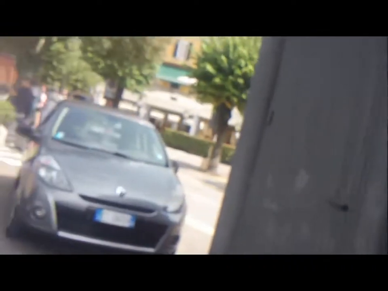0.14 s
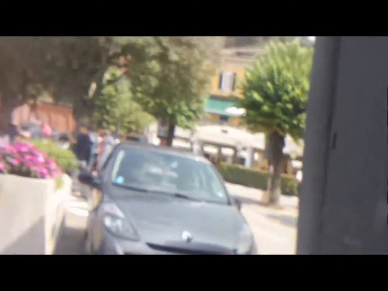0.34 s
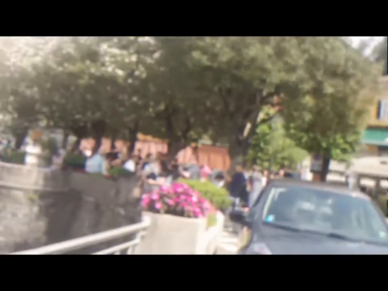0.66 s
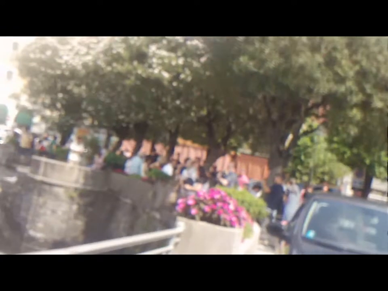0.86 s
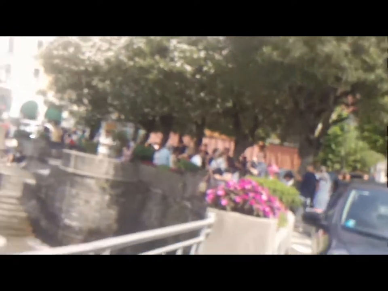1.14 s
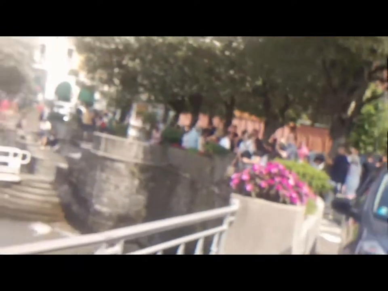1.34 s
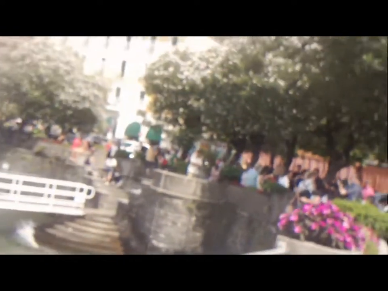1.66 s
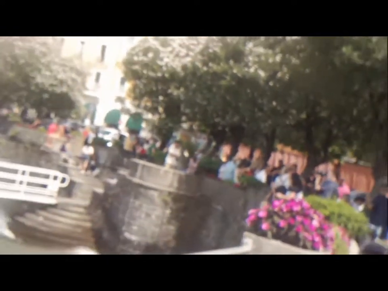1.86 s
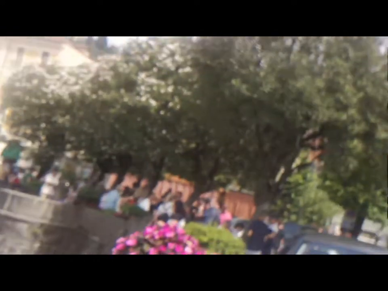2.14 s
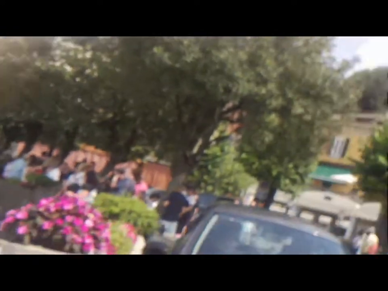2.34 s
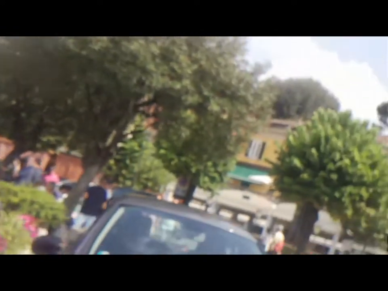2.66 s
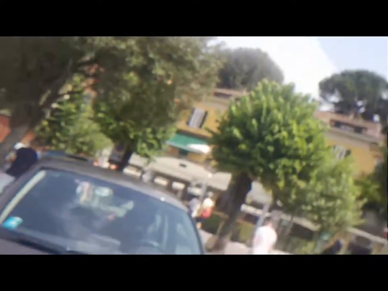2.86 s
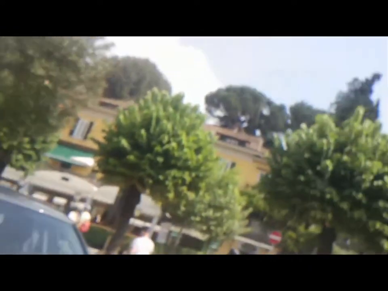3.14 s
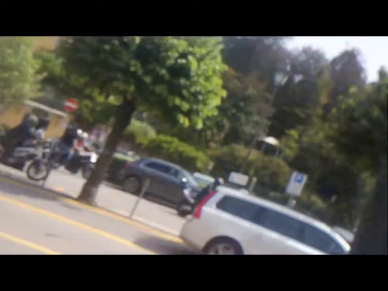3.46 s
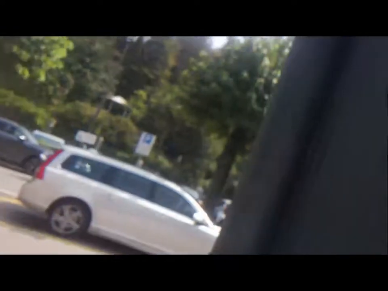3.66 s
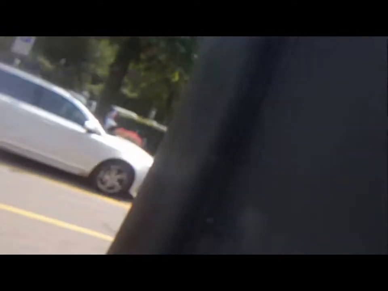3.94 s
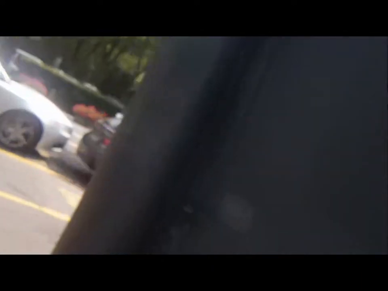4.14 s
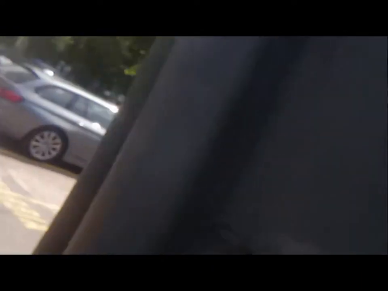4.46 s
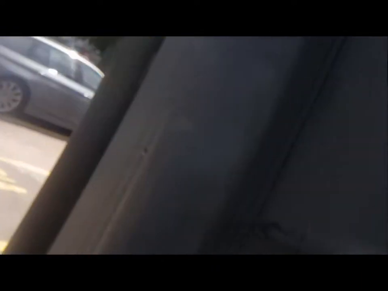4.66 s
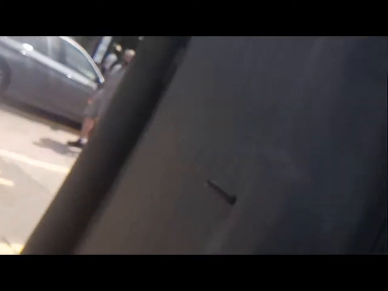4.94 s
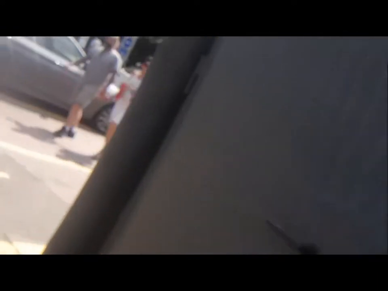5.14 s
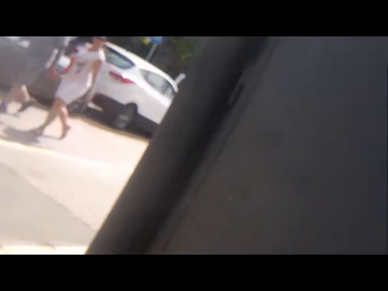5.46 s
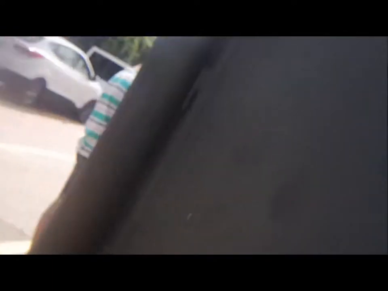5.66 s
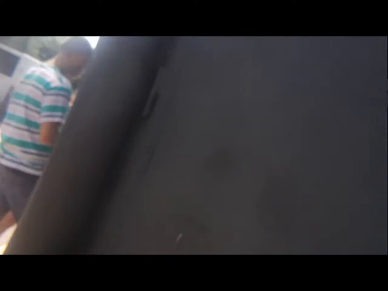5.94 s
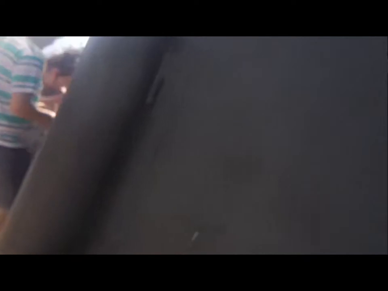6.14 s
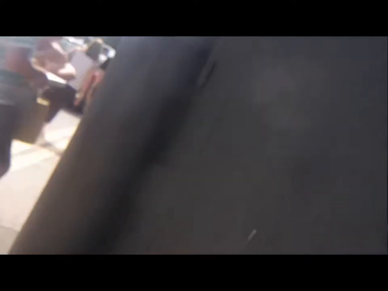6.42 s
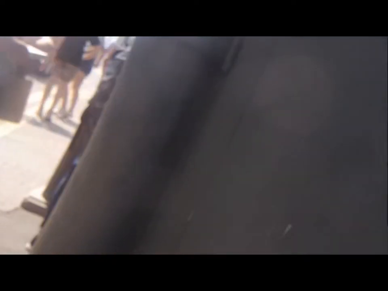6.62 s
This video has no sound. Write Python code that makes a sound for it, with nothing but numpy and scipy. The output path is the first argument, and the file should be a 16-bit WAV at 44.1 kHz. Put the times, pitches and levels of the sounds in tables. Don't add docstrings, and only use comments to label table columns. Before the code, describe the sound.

Close stereo microphone inside an open vehicle beside a busy street. A low drone idles under a steady high pump whine and traffic roar. The engine revs and pulls away, a slower chugging engine joining below. A fluttering squeal swells, then the whine drops and stops. Spitting air and knocks follow as both engines pick up speed, ending in a heavy low thump with rattling.

```python
import sys
import numpy as np
from scipy import signal
from scipy.fft import rfft, irfft, next_fast_len
from scipy.io import wavfile
from scipy.ndimage import uniform_filter1d, map_coordinates

SR = 44100
rng = np.random.default_rng(int(sys.argv[2]) if len(sys.argv) > 2 else 0)


def wav_record(signal):
    frames = np.transpose(np.atleast_2d(signal))
    bounded = np.clip(frames, -1, 1)
    quanta = np.round(bounded * 32767).astype(np.int16)
    wavfile.write(sys.argv[1], SR, quanta)


def gain_from_db(level_db):
    decades = np.asarray(level_db, float) / 20
    return 10 ** decades


N = 299439
STEP = 8

# (time [s], firing rate [Hz], load [dB], throttle swelling the strong orders [dB])
NEAR_ENGINE = [(2.4, 47.9, -44, -5), (2.61, 47.9, -30, -1), (2.749, 44.96, -25, 3.5), (2.86, 54.7, -24, -2),
               (3.06, 63.2, -25.5, 4), (3.28, 60.3, -26, 2.5), (3.57, 57.6, -24.5, -0.3),
               (4.001, 60.3, -20, -2), (4.199, 60.8, -24.5, -2.5), (4.36, 55.6, -22.5, -0.5),
               (4.62, 67.82, -24.5, -0.5), (5.0, 49.74, -22, -1.5), (5.31, 45.73, -21, -8),
               (5.52, 47.49, -21, -2.5), (5.87, 50.97, -22, 3.5), (6.25, 57.02, -26.5, 9.5),
               (6.69, 65.5, -26.5, 6), (6.79, 63.96, -28.5, 0.5)]
# (time [s], nearness [dB], brightness [dB])
TRAFFIC_PASSING = [(0.0, -0.5, 0.1), (0.48, 1, 1.3), (0.56, -2.5, 1), (1.2, 2.5, -2.1), (1.5, -1.3, 1),
                   (1.7, 3, -0.9), (1.95, -0.5, 1.3), (2.04, 3.5, 1), (2.5, 3, -1.1), (3.0, 2, 2.5),
                   (3.95, 3, 3), (4.06, 0, 2.2), (4.25, -0.5, -1.6), (4.9, -1.7, 0.7), (5.5, -2, -2.5),
                   (5.9, -0.7, -0.6), (6.5, -1.5, 0.3), (6.79, -4, 0.3)]
# (frequency [Hz], difference over sum [dB], likeness [0-1], lead of difference [rad])
MIC_PORTS = [(45, 1.4, .97, -2.55), (100, .4, 1, -2.34), (200, -2.1, .99, -1.98), (350, -6.3, .95, -1.72),
             (600, -8.5, .59, -1.56), (1000, -10.8, .75, -1), (1600, -7.8, .5, -.8), (2400, -4.7, .13, -1),
             (3400, -3.9, .36, .2), (4600, 1.1, .34, 0), (6200, 4.4, .39, -.2), (7400, 8, .35, 0),
             (8600, 12, .3, 0), (12000, 17.5, .3, 0), (15000, 18, .3, 0)]


def evened(x):
    return x / np.sqrt(np.mean(x ** 2) + 1e-20)


def read(points, hz, axis=1):
    table = np.transpose(points)
    return np.interp(np.log(hz + 1), np.log(table[0] + 1), table[axis])


def curves(rows, fade=0.01):
    s, *columns = np.transpose(rows)
    t = np.arange(N) / SR
    gate = np.clip(np.minimum(t - s[0], s[-1] - t) / fade + 1, 0, 1)
    return [np.interp(t, s, c) for c in columns] + [gate]


def wander(per_s, size=1):
    steps = rng.standard_normal(int(N / SR * per_s) + 3)
    coarse = np.arange(0, N + 64, 64)
    drift = map_coordinates(steps, [coarse / SR * per_s], order=3, mode="nearest")
    return np.interp(np.arange(0, N, size), coarse, drift)


def tone(hz):
    return np.cos(2 * np.pi * np.cumsum(hz) / SR)


def ports(x, other=None):
    size = next_fast_len(N + 4096)
    hz = np.fft.rfftfreq(size, 1 / SR)
    z = rfft(x, size) * np.exp(1j * read(MIC_PORTS, hz, axis=3))
    if other is not None:
        same = np.clip(read(MIC_PORTS, hz, axis=2), 0, 1)
        z = same * z + np.sqrt(1 - same ** 2) * rfft(other, size)
    return np.array([x, irfft(z * gain_from_db(read(MIC_PORTS, hz)), size)[:N]])


def resonate(x, hz, width):
    turn = np.exp(2j * np.pi * np.cumsum(hz) / SR)
    r = np.exp(-np.pi * width / SR)
    return 2 * (turn * signal.lfilter([1 - r], [1, -r], x / turn)).real


def surroundings(turns):
    centres = [330, 650, 3300, 9000]
    # (resting level [dB], share of nearness, share of brightness, rise with rolling [dB per m/s])
    layers = [
        (5.5, 0.082, 0.2, 3),
        (4.5, 0.97, 0, 0),
        (4, 1.08, 0.96, 0.5),
        (5, 0.27, 1.32, 0),
    ]
    # (time [s], speed [m/s])
    rolling = [
        (0, 0.5),
        (1.9, 0),
        (2.1, 1.6),
        (2.5, 1.5),
        (3, 2.5),
        (6.1, 4),
        (6.4, 4),
        (6.62, 6),
        (6.79, 3),
    ]
    # (frequency [Hz], density [dB per Hz])
    colour = [(40, -56), (90, -45), (250, -50), (450, -56), (620, -60), (800, -55), (1100, -57),
              (1400, -60), (1800, -57), (2300, -62), (7000, -61), (9000, -62), (12200, -64), (15400, -73)]
    frames, hz = N // 256 + 5, np.fft.rfftfreq(1024, 1 / SR)
    at = np.clip(np.arange(frames) * 256, 0, N - 1)
    near_db, bright_db, _ = curves(TRAFFIC_PASSING)
    speed = curves(rolling)[0]
    near_db = near_db + 0.29 * wander(14)
    swell_db = 0
    for row, (db, near_share, bright_share, per_speed) in zip(np.eye(len(centres)), layers):
        region = np.interp(np.log(hz + 1), np.log(centres), row)
        level_db = db + near_share * near_db + bright_share * bright_db + per_speed * speed
        gusts_db = 0.61 * wander(9)
        swell_db = swell_db + np.outer(region, (level_db + gusts_db)[at])
    a, b, c, d, patches = rng.standard_normal((frames, 513, 5)).T
    patches = uniform_filter1d(uniform_filter1d(patches, 8, 0), 10, 1)
    patches = .7 * evened(patches)
    colour_db = read(colour, hz) - read(MIC_PORTS, hz)
    z = np.array([a + 1j * b, c + 1j * d])
    z = z * gain_from_db(colour_db[:, None] + swell_db + 1.6 * patches + 32.0)
    noise = signal.istft(z, nperseg=1024, noverlap=768)[1][:, :N] / np.sqrt(1024)
    return ports(*(noise * (1 + 0.1 * np.cos(turns))))


def bursts():
    # (time [s], level [dB], low edge [Hz], high edge [Hz], decay time t60 [s])
    knocks = [(2.015, -42, 150, 4000, .5), (2.04, -30, 150, 450, .08), (3.835, -27, 1500, 9000, 0.18),
              (3.935, -28, 1500, 7000, 0.14), (4.434, -26.5, 1300, 14700, 0.17),
              (4.44, -27.5, 899, 2760, 0.51), (4.93, -23.5, 399.2, 1485, 0.11),
              (5.068, -21, 300.2, 1500, 0.048), (5.16, -23, 400, 1500, 0.078),
              (5.948, -32, 4996, 7010, 0.23), (6.546, -13.5, 300, 1902, 0.046),
              (6.553, -26.5, 1500, 5001, 0.29), (6.57, -9.5, 81, 150.9, 0.22),
              (6.578, -12, 301, 790, 0.091), (6.593, -17, 350, 1357, .07)]
    out, t = np.zeros((2, N)), np.arange(SR // 2) / SR
    for s, db, low_hz, high_hz, t60 in knocks:
        band = signal.butter(3, [low_hz, min(high_hz, 16000)], "bandpass", fs=SR, output="sos")
        noise = evened(signal.sosfilt(band, rng.standard_normal((2, len(t)))))
        rise = .03 * t60
        envelope = np.minimum(t / rise, 1) * gain_from_db(db - 60 * np.maximum(t - rise, 0) / t60)
        part = out[:, round(s * SR):][:, :len(t)]
        part += (noise * envelope)[:, :part.shape[1]]
    return ports(*out)


def leak():
    # (time [s], level [dB])
    let_off = [
        (4.432, -46),
        (4.445, -50),
        (4.465, -50),
        (4.49, -46),
        (4.9, -49),
        (5.12, -41),
        (5.26, -47),
        (5.3, -58),
    ]
    level_db, gate = curves(let_off, fade=.003)
    band = signal.butter(3, [7000, 12400], "bandpass", fs=SR, output="sos")
    air = evened(signal.sosfilt(band, rng.standard_normal(N)))
    hiss = gate * gain_from_db(level_db + 2.5 * wander(25)) * air
    return np.array([hiss, 1.2 * hiss])


def intake():
    lead_s = .07
    rate, *_, gate = curves(np.array(NEAR_ENGINE) - [lead_s, 0, 0, 0])
    gate = gate * np.clip((4.85 - np.arange(N) / SR) / 0.19, 0, 1)
    hz = 62 * rate
    level_db = -43 + curves(TRAFFIC_PASSING)[0]
    whistle = resonate(resonate(rng.standard_normal(N), hz, 140), hz, 140)
    return gate * gain_from_db(level_db) * evened(whistle)


def idle():
    # (time [s], frequency [Hz], level [dB])
    drone = [
        (0.0, 183, -47),
        (0.2, 186.7, -32),
        (0.84, 189, -37),
        (1.19, 188, -31),
        (1.74, 187, -32.5),
        (1.99, 192, -32),
        (2.24, 200.1, -41),
        (2.43, 201.0, -31),
        (2.6, 197.8, -28.5),
    ]
    # (multiple of the drone, level [dB])
    companions = [(.5, -9), (0.671, -11.5), (1, 0.5), (1.17, -7.5), (1.55, -16.5), (2.1, -13.5)]
    hz, level_db, gate = curves(drone, fade=0.39)
    turns = 2 * np.pi * np.cumsum(hz) / SR
    out = 0
    for k, db in companions:
        out = out + gain_from_db(level_db + db + 3.5 * wander(8.9)) * np.cos(k * turns)
    return np.sqrt(2) * gate * out


def squeal():
    # (time [s], frequency [Hz], level [dB])
    chirp = [
        (3.35, 1787, -41),
        (3.5, 1857, -36.5),
        (3.75, 1840, -34),
        (3.95, 1858, -37),
        (4.05, 1850, -26),
        (4.14, 1804, -31),
        (4.18, 1858, -31),
    ]
    # (time [s], frequency [Hz], level [dB])
    falling_chirp = [
        (4.13, 1700, -30),
        (4.16, 1712, -31),
        (4.2, 1681, -24),
        (4.22, 1645, -32),
    ]
    hz, level_db, gate = curves(chirp)
    upper = gain_from_db(3.0 * wander(30)) * tone(hz + 14 * wander(60))
    lower = gain_from_db(3.0 * wander(30)) * tone(hz - 45 + 16 * wander(60))
    lower *= np.clip((3.97 - np.arange(N) / SR) / 0.044, 0, 1)
    dying_hz, dying_db, dying_gate = curves(falling_chirp, fade=.01)
    dying = dying_gate * gain_from_db(dying_db) * tone(dying_hz)
    return np.sqrt(2) * (gate * gain_from_db(level_db) * (upper + lower) + dying)


def pump():
    # (time [s], first partial [dB], upper partials [dB])
    whine = [(0.0, -35, -45), (0.2, -31.5, -48), (0.7, -35, -46), (0.88, -38, -51.5), (1.1, -36.5, -44.5),
             (1.65, -33.5, -43.5), (1.8, -30.5, -43), (1.9, -41, -52), (2.1, -31, -41.5),
             (2.65, -39, -46.5), (3.02, -41, -46.5), (3.12, -27.5, -48), (3.32, -25, -40),
             (3.44, -33.5, -38), (3.7, -32, -39), (3.85, -30, -38), (4.0, -32, -36.5), (4.1, -29, -42)]
    # (time [s], first partial [Hz])
    pitch = [(0, 1721.2), (4.15, 1721.2)]
    # (multiple, sum [dB], difference [dB])
    upper_partials = [(3, -11, -14), (11 / 3, -14, -13), (3.942, -15, -16), (3.971, -17, -16), (4, -1, 0),
                      (4.058, -15, -14), (13 / 3, -16, -14), (5, -17, -18), (7, -28, -23), (8, -27, -21)]
    side_db = [[-0.5], [-10]], [[-2], [6]]
    *level_db, late_gate = curves(whine, fade=0.19)
    hz, gate = curves(pitch, fade=0.008)
    turns = 2 * np.pi * np.cumsum(hz + 1.8 * wander(30)) / SR
    faded_db = []
    for level, side in zip(level_db, side_db):
        fades_db = 1.9 * np.array([wander(7.16), wander(7.16)])
        faded_db.append(level + np.array(side) + fades_db)
    low_db, high_db = faded_db[0] + 2.5, faded_db[1] + 5.5
    lead = np.array([[0], [-.7]])
    out = gate * gain_from_db(low_db + 1.5 * wander(30)) * np.cos(turns + 1.8 * lead + .4 * wander(20))
    out += gate * gain_from_db(low_db + [[-20], [-14]] + 3.0 * wander(10)) * np.cos(2 * turns + lead)
    for multiple, *db in upper_partials:
        partial_db = high_db + np.c_[db] + 2.6 * wander(16)
        out += late_gate * gain_from_db(partial_db) * np.cos(multiple * turns + lead)
    return np.sqrt(2) * out


def slow_engine():
    # (time [s], cycle rate [Hz], load [dB])
    chug = [(2.5, 12.5, -39), (2.85, 12.8, -33), (3.05, 13.9, -31), (3.83, 12.95, -28), (4.3, 13.4, -29),
            (4.62, 13.54, -25.5), (5.1, 13.06, -28), (5.37, 15.9, -28), (5.79, 18.5, -28),
            (6.05, 21.4, -24), (6.2, 19.2, -38)]
    # (order, level [dB])
    order_levels = [(4, -14), (6, -3), (7, -3), (9, -2), (10, -4), (11, -12), (12, -16), (14, -12),
                    (20, -8), (27, -8), (33, -9)]
    # (frequency [Hz], gain [dB])
    floor_panel = [(60, -27), (69, -1.5), (80, 4), (104, 3.5), (130, -8), (150, -25), (160, -2)]
    hz, load_db, gate = (c[::STEP] for c in curves(chug))
    turns = 2 * np.pi * np.cumsum(hz) * STEP / SR
    out = sum(gain_from_db(load_db + read(floor_panel, k * hz)) * np.cos(k * turns) for k in (5, 8))
    for k in set(range(4, 34)) - {5, 8}:
        body_loss_db = 0.18 * np.maximum(k * hz - 430, 0)
        level_db = load_db - 5.0 + read(order_levels, k) - body_loss_db
        slip = .004 * k * k * wander(9, size=STEP)
        shake_db = 2.8 * wander(3.946, size=STEP)
        out += gain_from_db(level_db + shake_db) * np.cos(k * turns + .3 * k * k + slip)
    return np.sqrt(2) * signal.resample_poly(gate * out, STEP, 1)[:N]


def near_engine():
    # (frequency [Hz], level [dB])
    exhaust = [(40, -24), (60, -8), (120, -2), (300, 0), (420, -3), (520, -9), (700, -21), (1500, -26)]
    # (frequency [Hz], gain [dB])
    cabin = [(140, -20), (158, -13), (176, -2.5), (203, 2.5), (230, 1.5), (255, -3), (295, -7), (340, -2.5)]
    # (order, level [dB], share of throttle)
    strong_orders = [(3, 0.7, 0.92), (4, -1.26, 1.1), (5, -1.5, 0.44)]
    cylinders_db = [2.0, -1.2, -1.8]
    hz, load_db, throttle_db, gate = curves(NEAR_ENGINE, fade=0.22)
    turns = 2 * np.pi * np.cumsum(hz * (1 + .005 * wander(25))) / SR
    hz, load_db, throttle_db = hz[::STEP], load_db[::STEP], throttle_db[::STEP]
    slow_turns = turns[::STEP]
    strong = {k: db + share * throttle_db for k, db, share in strong_orders}
    firing, count = (slow_turns - 0.596) / (2 * np.pi), np.arange(int(N / SR * 70))
    misfire_db = 2.4 * rng.standard_normal(len(count))
    bang_db = np.interp(firing, count, np.take(cylinders_db, count, mode="wrap") + misfire_db)
    bang_db = bang_db * np.clip(1 - throttle_db / 14, .3, 1.3)
    out = 0
    for k in range(1, 16):
        if k in strong:
            colour_db = strong[k] + read(cabin, k * hz)
        else:
            colour_db = -7.5 + read(exhaust, k * hz)
        rough = .06 * max(k - 5, .6)
        shake_db = (1 + 6 * rough) * wander(18, size=STEP) + np.clip((k - 4) / 2, 0, 1) * bang_db
        slip = 1.6 * rough * wander(22, size=STEP)
        out = out + gain_from_db(load_db + colour_db + shake_db) * np.cos(k * slow_turns - 0.63 * k + slip)
    return gate * signal.resample_poly(np.sqrt(2) * out, STEP, 1)[:N], turns


def scene():
    engine, turns = near_engine()
    direct = engine + idle() + intake() + slow_engine() + squeal()
    total, difference = ports(direct) + pump() + surroundings(turns) + bursts() + leak()
    return np.array([total + difference, total - difference])


def band_limit(x):
    return signal.sosfilt(signal.butter(12, 15460, fs=SR, output="sos"), x)


def record(dry):
    ceiling = .86
    low_cut = signal.butter(3, 50, "highpass", fs=SR, output="sos")
    notch = signal.butter(2, [9200, 10950], "bandstop", fs=SR, output="sos")
    limited = ceiling * np.tanh(1.08 * dry / ceiling)
    mix = signal.sosfilt(np.r_[low_cut, notch, notch[:1]], limited)
    return band_limit(mix)


dry = scene()
out = record(dry)
wav_record(out)
```